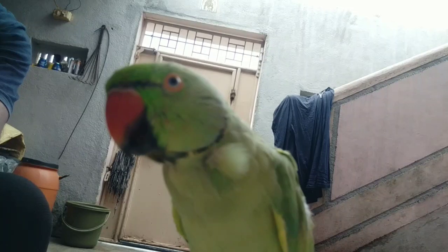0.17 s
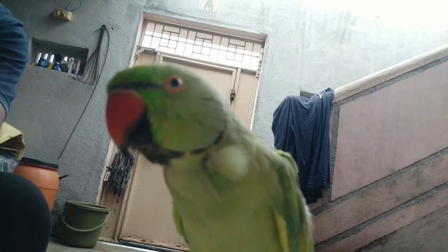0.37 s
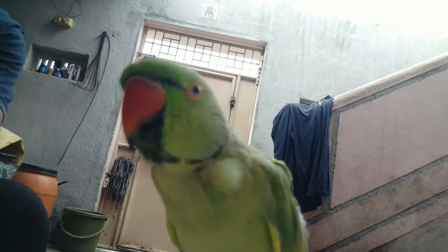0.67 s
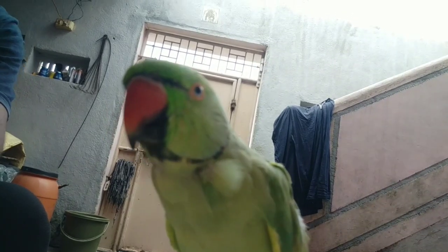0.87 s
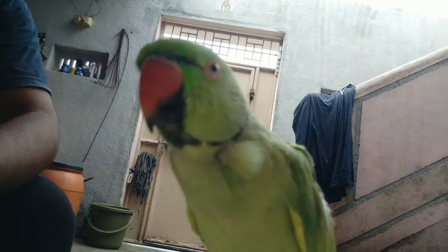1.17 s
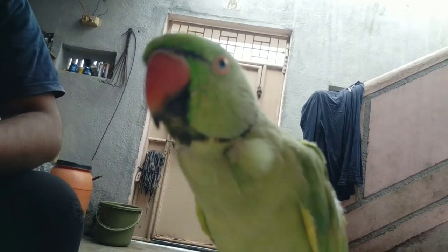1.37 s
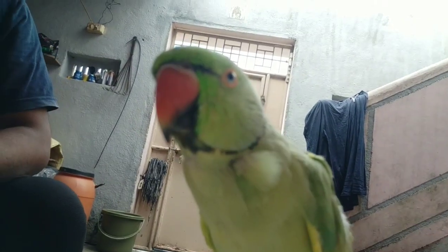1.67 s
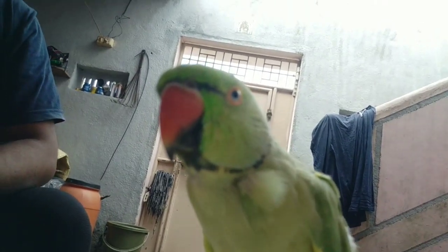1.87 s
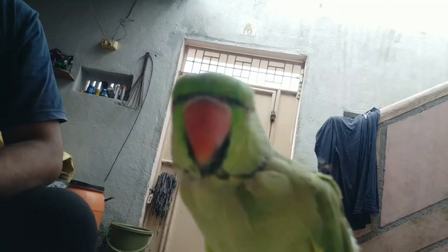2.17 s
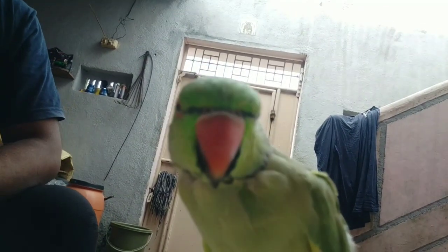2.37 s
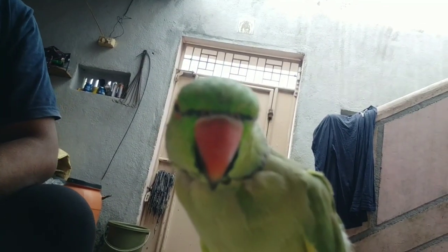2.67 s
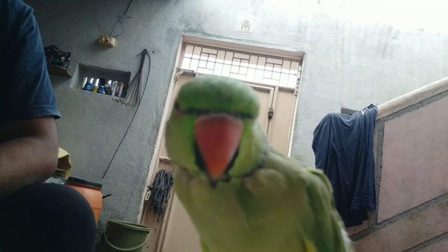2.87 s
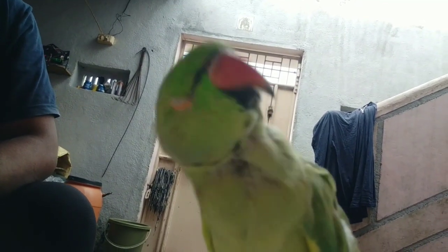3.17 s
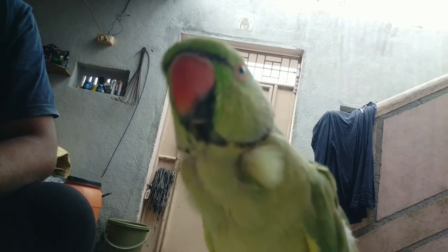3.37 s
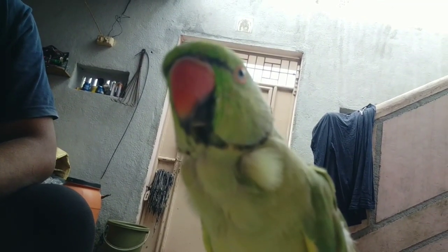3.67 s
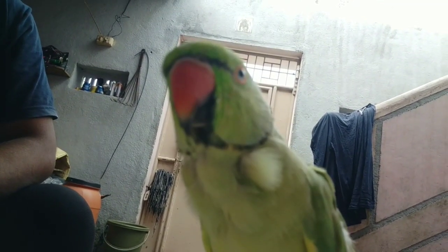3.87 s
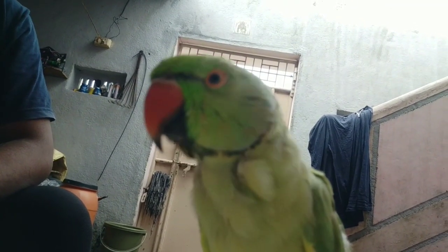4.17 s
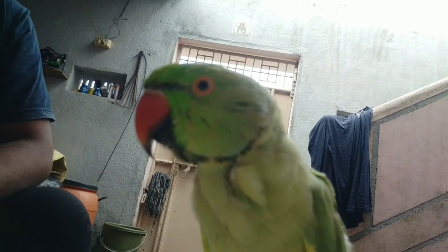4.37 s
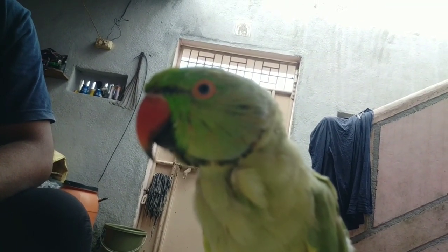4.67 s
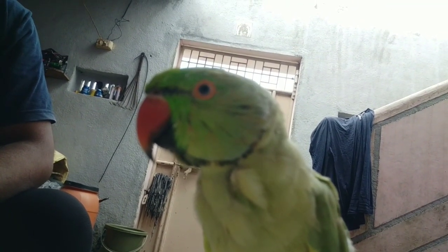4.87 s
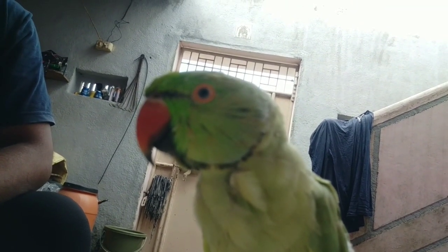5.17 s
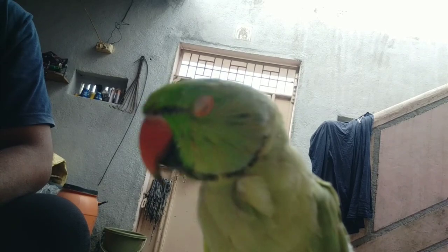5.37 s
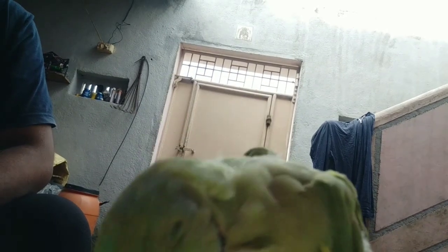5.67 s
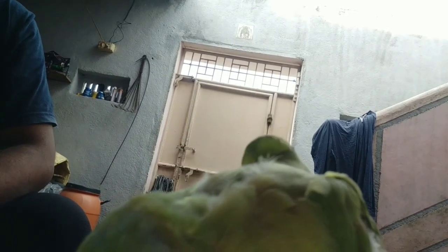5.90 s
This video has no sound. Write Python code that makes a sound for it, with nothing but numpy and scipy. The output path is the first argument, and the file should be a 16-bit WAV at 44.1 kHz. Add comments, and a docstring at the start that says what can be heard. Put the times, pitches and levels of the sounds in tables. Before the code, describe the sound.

In a walled courtyard, a parakeet right beside the microphone gives four short, loud gliding whistles, with a sharp beak click after the second. From about a second and a half on, it is quiet: feathers rustle softly, a hand faintly bumps the microphone, and a small bird chirps beyond the wall. A distant motor drones under a low town rumble.

```python
"""A walled courtyard, a parakeet perched right by a phone's two microphones, town rumble behind.
We come in on the first of four gliding whistles from its syrinx; after the second it clicks its beak.
From 1.5 s on the whistling is over: feathers rustle, a hand bumps the phone, the beak ticks faintly
twice more and a small bird chirps beyond the wall. A distant motor drones, loudest just after 3 s."""
import sys
import numpy as np
from scipy import signal
from scipy.fft import rfft, irfft
from scipy.io import wavfile

SR = 44100
rng = np.random.default_rng(int(sys.argv[2]) if len(sys.argv) > 2 else 0)


def to_wav(s):
    """Save 16-bit WAV."""
    ch = np.atleast_2d(s).T  # columns
    pcm = np.round(np.clip(ch, -1, 1) * 32767)  # PCM
    wavfile.write(sys.argv[1], SR, pcm.astype(np.int16))


N = 266143
T = np.arange(N) / SR
F = np.maximum(np.arange(N // 2 + 1) * SR / N, 1)

# The parakeet, close up, one list a whistle. Each row: time in seconds, pitch in Hz, fundamental in dB,
# mouth resonance in Hz, overtones at that resonance in dB, treble partials in dB.
WHISTLES = [
    [(0.02, 982.4, -25.5, 3400, -7, -20.5), (0.083, 980.7, -21, 3813, -7, -28),
     (0.092, 985.6, -24.5, 3789, -9.5, -27), (0.1, 1012, -28, 3742, -12.5, -24),
     (0.108, 959, -27.5, 3497, -16, -21.5), (0.116, 955, -35.5, 3120, -22.5, -39.5),
     (0.122, 885, -56, 3000, -43.5, -53)],
    [(0.177, 1462, -47, 3194, -55.5, -71), (0.185, 1462, -27, 3300, -33, -54),
     (0.19, 1394, -20, 4000, -17, -33), (0.205, 1204, -23.5, 3285, -17, -28),
     (0.222, 1080, -21.5, 2550, -10.5, -28), (0.24, 998, -23, 2400, -8, -35.5),
     (0.27, 913, -22, 2310, -11.5, -44.5), (0.305, 869, -20.5, 2050, -11.5, -55.5),
     (0.32, 881, -21, 2030, -24.5, -60), (0.36, 875.6, -20.5, 2050, -24.5, -55.5),
     (0.39, 905, -16, 1950, -24.5, -50.5), (0.405, 992, -16, 1950, -21.5, -51.5),
     (0.415, 1088, -17.5, 1950, -22, -49.5), (0.423, 1311, -16, 3400, -39.5, -50),
     (0.445, 1364, -16.5, 3100, -43.5, -44), (0.458, 1361, -43.5, 3200, -59.5, -63)],
    [(0.805, 1234, -45.5, 2500, -64.5, -73.5), (0.83, 1144, -24.5, 2200, -36.5, -64.5),
     (0.885, 1386, -19.5, 3210, -47.5, -54), (0.904, 1559, -23, 6287, -32.5, -51.5),
     (0.918, 1765, -19, 5400, -23, -32.5), (0.93, 1870, -12, 5675, -19, -27.5),
     (0.94, 1987, -14, 5850, -11.5, -26), (0.957, 2286, -15.5, 6900, -37, -46),
     (0.975, 2200, -41.5, 6500, -56, -61.5)],
    [(1.085, 1550, -56, 3180, -65.5, -62), (1.105, 1600, -33.5, 3160, -47, -69),
     (1.19, 1580, -27, 3100, -42.5, -41.5), (1.25, 1636, -18.5, 3220, -49, -32.5),
     (1.3, 1644, -19.5, 3200, -45.5, -28.5), (1.33, 1606, -19.5, 3100, -35.5, -30.5),
     (1.36, 1487, -13.5, 2700, -40.5, -32), (1.385, 1263, -15, 2213, -28, -42),
     (1.41, 1057, -16, 2050, -24.5, -44), (1.44, 975, -19.5, 1850, -24, -55),
     (1.455, 994, -46.5, 1900, -59, -62.5)],
]
# Roughness, one row a whistle. Each row: slow membrane's starting rate in Hz, power of the pitch that it
# follows, its lower sideband, upper sideband and own tone in relative dB, rasp in dB, jitter in radians
# per partial number, slope above the beak's upper corner in dB per octave.
ROUGHNESS = [(350, 0, -55, -55, -62, -21, .03, -20), (330, -.3, -54, -56, -54, -27, .1, -22),
             (395, -.3, -37, -48, -48, -29, .17, -9), (370, .4, -34, -44, -55, -31, .05, -4)]
# Mouth tuning, one row a whistle. Each row: fade under, then over the resonance in dB per octave squared.
MOUTH_SKIRTS = [(9, 130), (44.7, 55), (57.5, 42), (50, 23)]
# The beak's colouring of the treble partials. Each row: frequency in Hz, gain in dB.
BEAK_RESPONSE = [(4500, 3), (6500, 0), (8200, 3), (10000, -2.5), (11500, 0), (13000, -8.5), (15500, -22)]
# The bird's breath. Each row: frequency in Hz, relative density in dB.
BREATH_SPECTRUM = [(250, -16), (1200, -12), (3000, -0.5), (4800, -6.5), (6500, -7), (9000, 2), (12300, -4),
                   (13800, -17), (16000, -29.5)]
# Air past the membranes at attacks and glides. Each row: middle and half length in seconds, level in dB.
AIR_PUFFS = [(0.074, 0.0083, -23), (0.131, .006, -39), (0.192, 0.008, -25), (0.211, .025, -38),
             (0.41, 0.037, -31.5), (0.893, 0.026, -35.5), (0.958, 0.0047, -33), (1.17, .05, -42.5),
             (1.389, 0.038, -31.5)]
# Beak clicks. Each row: start in seconds, peak at the beak in dB.
BEAK_CLICKS = [(0.6455, -8.5), (2.745, -43.5), (5.76, -39)]
# The beak's ring. Each row: frequency in Hz, relative level in dB, 60 dB decay time in seconds.
BEAK_MODES = [(8400, 6.5, .0035), (2000, -5.5, 0.0044), (11340, -12, 0.0022), (750, -21, 0.0092)]
# The parakeet at the two microphones. Each row: frequency in Hz, left over right in dB, left's lead in
# radians.
MIC_DIFFERENCES = [(500, 2, 0.2), (900, 5, 0.2), (1200, 11, 0.0), (1450, 12, -1.3), (1620, 8, -2.5),
                   (1760, 14, -1.8), (2000, 10, -2.4), (2300, 7, -2.9), (2900, 5, -3.3), (3500, 1, -4.4),
                   (4000, 0, -4.2), (4900, -3, -6.1), (5850, -1, -5.3), (6600, -1, -6.3), (8100, -6, -9.0),
                   (9800, -4, -11.2), (11400, -3, -10.5), (14000, 6, -13.8)]
# Feathers and cloth, close by. Each row: middle and half length in seconds, centre in Hz, level in dB.
BRUSHES = [(0.681, .05, 7920, -68), (.8, 0.097, 7900, -79), (1.017, .25, 9400, -40.5),
           (2.368, 0.071, 8400, -52), (2.607, 0.036, 9900, -54.5), (3.257, 0.057, 9600, -55),
           (3.328, 0.096, 7000, -54.5), (3.884, 0.089, 6350, -54)]
# Faint distant calls, narrow swells of sound. Each row: middle and half length in seconds, centre in Hz, level
# in dB.
FAR_CALLS = [(1.073, 0.027, 855, -39.5), (1.167, 0.022, 829, -44.5), (2.997, 0.14, 2954, -64.5),
             (3.769, 0.081, 2397, -58.5), (3.787, 0.075, 4270, -59), (4.409, .11, 3617, -61),
             (4.495, .14, 2370, -58), (5.147, 0.13, 3770, -57), (5.182, 0.027, 2400, -66),
             (5.694, 0.11, 3520, -65.5)]
# A hand on the phone. Each row: middle and half length in seconds, pitch in Hz, level in dB.
HAND_BUMPS = [(0.512, 0.11, 40.2, -48), (0.48, 0.034, 222, -53), (1.5, 0.0642, 39.3, -54),
              (2.399, 0.048, 40, -48.5), (5.815, 0.039, 41.9, -52), (5.874, 0.074, 81.6, -52)]
# The bird beyond the wall. Each row: start and length in seconds, starting pitch in Hz, fall in octaves
# per second, level in dB.
FAR_CHIRPS = [(1.579, 0.087, 6974, 3.5, -50), (1.99, 0.11, 6450, 2.5, -51.5), (2.418, .11, 7170, 3.5, -49),
              (2.843, 0.094, 7410, 4, -47.5), (3.091, 0.064, 6300, 2, -53.5),
              (3.12, 0.076, 4340, 4.5, -54.5), (3.574, 0.061, 7040, 2.7, -45.5),
              (3.986, 0.058, 6880, 4.5, -48.5), (4.174, 0.043, 5950, 1.7, -56),
              (4.222, 0.063, 4600, 6.5, -58), (4.358, 0.073, 7060, 4.5, -48.5),
              (4.472, 0.067, 7020, 4, -47), (4.704, 0.067, 5660, -1.6, -52), (4.756, 0.073, 6890, 3.5, -48),
              (5.15, 0.09, 7060, 3.5, -46.5), (5.57, 0.087, 6670, 2.5, -49), (5.625, .1, 5616, 4.5, -55)]
# The distant motor. Each row: time in seconds, level in dB.
MOTOR_LEVELS = [(0.1, -67), (0.55, -72), (0.8, -59.5), (1.4, -67), (2.3, -62.5), (3.3, -54.5), (3.7, -60),
                (4.82, -58), (5.5, -71), (6.03, -67)]
# Faint passing hums. Each row: middle and half length in seconds, centre and width in Hz, level in dB.
PASSING_HUMS = [(4.5, 0.77, 162, 11.4, -62), (5.0, 0.24, 195, 7.3, -65.5)]
# The town from inside the yard. Each row: frequency in Hz, relative density in dB.
TOWN_SPECTRUM = [(15, -31.5), (24, -4), (33, -4.5), (40, -1), (55, -8.5), (80, -5.5), (120, -9), (277, -19),
                 (489, -19), (624, -23.5), (936, -26.5), (3620, -27.5), (5280, -30), (14800, -34.5),
                 (16000, -56)]
# How alike the town is at the two microphones. Each row: frequency in Hz, correlation from -1 to 1.
TOWN_LIKENESS = [(30, .8), (60, .88), (130, .9), (290, .65), (640, .41), (1410, -.1), (3100, .02),
                 (15000, .02)]

BEAK_LOW_HZ, BEAK_HIGH_HZ = 5940, 7900  # treble partials thin out beyond these corners
BEAK_LOW_DB_PER_OCTAVE, PARTIAL_WAVER_DB = -35.5, 1.5
LEAK_DB = -35.5  # steady breath, relative to the fundamental
OPEN_S, TOP_HZ = .0824, 15700


def undb(db):
    """Turn dB into gain."""
    return 10 ** (np.asarray(db) / 20)


def unit(x):
    """Scale to rms 1."""
    return x / np.sqrt(np.mean(x ** 2))


def along(table, hz, column=1):
    """Read a column of a spectrum table on a log-frequency axis."""
    table = np.array(table, float)
    return np.interp(np.log(hz), np.log(table[:, 0]), table[:, column])


def noise(gain, channels=2):
    """Noise of rms 1 with the given gain per frequency, unrelated in each channel."""
    return unit(irfft(rfft(rng.standard_normal((channels, N))) * gain, N))


def peak(hz, width_hz):
    """Gain of a resonance applied twice."""
    return 1 / (1 + ((F - hz ** 2 / F) / width_hz) ** 2)


def swell(middle, half):
    """A bell-shaped rise and fall, timed in seconds."""
    return np.exp(-((T - middle) / half) ** 2)


def parakeet_whistles():
    """Tone and breath, close up: mouth and beak shape the syrinx; a slower membrane adds sidebands."""
    tone, breath = np.zeros(N), np.zeros(N)
    flutter = noise(peak(90, 230), channels=1)[0]
    shimmer = noise(peak(250, 900), channels=1)[0]
    waver = noise(peak(15, 40), channels=15)  # each treble partial swells and fades on its own
    puffs = sum(undb(db) * swell(s, half) for s, half, db in AIR_PUFFS)
    for rows, (under_db, over_db), roughness in zip(WHISTLES, MOUTH_SKIRTS, ROUGHNESS):
        slow_hz, follow, lower_db, upper_db, slow_db, rasp_db, jitter, slope_db = roughness
        times, *columns = np.transpose(rows)
        span = slice(int(times[0] * SR), int((times[-1] + .004) * SR))
        t = T[span]
        hz, level_db, mouth_hz, mouth_db, treble_db = (np.interp(t, times, c) for c in columns)
        phase = 2 * np.pi * np.cumsum(hz) / SR
        slow = 2 * np.pi * np.cumsum(slow_hz * (hz / hz[0]) ** follow) / SR
        sidebands = undb(lower_db) * np.sin(phase - slow) + undb(upper_db) * np.sin(phase + slow)
        membrane = sidebands + undb(slow_db) * np.sin(slow)
        # the slow membrane swells by half as many dB as the whistle
        voice = undb(level_db) * np.sin(phase) + undb(.5 * level_db) * membrane
        for k in range(2, 17):
            partial_hz = k * hz
            skirt_db = np.where(partial_hz < mouth_hz, under_db, over_db)
            overtone_db = mouth_db - skirt_db * np.log2(partial_hz / mouth_hz) ** 2
            voice += undb(overtone_db) * np.sin(k * phase + k * k)
            beak_db = treble_db + along(BEAK_RESPONSE, partial_hz)
            beak_db += slope_db * np.log2(np.maximum(partial_hz / BEAK_HIGH_HZ, 1))
            beak_db += BEAK_LOW_DB_PER_OCTAVE * np.log2(np.maximum(BEAK_LOW_HZ / partial_hz, 1))
            beak_db += PARTIAL_WAVER_DB * waver[k - 2, span]
            jittered = k * (phase + jitter * flutter[span])
            voice += (partial_hz < TOP_HZ) * undb(beak_db) * np.cos(jittered + k * k)
        rasp = 1 + undb(rasp_db) * shimmer[span]  # uneven cycles fill the gaps between partials
        fade = np.clip(np.minimum(t - t[0], t[-1] - t) / .001, 0, 1)
        tone[span] += np.sqrt(2) * voice * fade * rasp
        breath[span] += (puffs[span] + undb(level_db + LEAK_DB)) * fade
    return tone, breath * noise(undb(along(BREATH_SPECTRUM, F)), channels=1)[0]


def beak_clicks():
    """At each click the horn of the beak rings for a few milliseconds."""
    out = np.zeros(N)
    t = np.arange(SR // 20) / SR
    ring = sum(undb(db - 60 * t / t60) * np.sin(2 * np.pi * hz * t) for hz, db, t60 in BEAK_MODES)
    ring *= np.clip(t / .0005, 0, 1)
    for s, db in BEAK_CLICKS:
        start = int(s * SR)
        out[start:start + len(t)] += undb(db) * ring / np.abs(ring).max()
    return out


def at_microphones(x):
    """A close source reaches the two microphones at different level and phase; the mean power stays."""
    ratio = undb(along(MIC_DIFFERENCES, F))
    lead = np.exp(.5j * along(MIC_DIFFERENCES, F, column=2))
    left_right = np.array([ratio * lead, 1 / lead]) * np.sqrt(2 / (1 + ratio ** 2))
    return irfft(rfft(x) * left_right, N)


def wall_echo(x, t60, treble_t60, build_s):
    """Diffuse echoes off the walls build up and die away, unrelated left and right."""
    t = np.arange(SR) / SR
    white = rng.standard_normal((2, SR))
    low = signal.lfilter(*signal.butter(2, 3000, fs=SR), white)
    tail = low * undb(-60 * t / t60) + (white - low) * undb(-60 * t / treble_t60)
    tail *= np.clip(t / build_s, 0, 1) ** 2
    tail /= np.sqrt(np.sum(tail ** 2) / 2)
    return signal.fftconvolve(np.atleast_2d(x), tail, axes=1)[:, :N]


def rustles():
    """Feathers and cloth brush near the microphones as broad grainy hiss; faint narrow-band calls swell in the
    distance."""
    grain = undb(.73 * noise(peak(200, 600)))
    rolloff = 1 + (F / 13660) ** 8
    brush = sum(undb(db) * swell(s, half) * noise(np.sqrt(peak(hz, 1.15 * hz) / rolloff))
                for s, half, hz, db in BRUSHES)
    hush = sum(undb(db) * swell(s, half) * noise(np.sqrt(peak(hz, .31 * hz)))
               for s, half, hz, db in FAR_CALLS)
    return (brush + hush) * grain


def handling():
    """A hand on the phone makes low bumps, the same in both microphones."""
    return sum(undb(db) * swell(s, half) * np.sqrt(2) * np.sin(2 * np.pi * hz * (T - s))
               for s, half, hz, db in HAND_BUMPS)


def far_bird():
    """Trilled chirps beyond the wall, nearly all falling, heard mostly through their echoes."""
    trill_hz, trill_depth_hz, ragged_db, direct_db = 55.45, 338, 2, -8.5
    out = np.zeros(N)
    for s, length, start_hz, fall, db in FAR_CHIRPS:
        t = np.arange(int(length * SR)) / SR
        hz = start_hz * 2 ** (-fall * t) + trill_depth_hz * np.sin(2 * np.pi * trill_hz * t)
        arch = np.sin(np.pi * t / length)
        start = int(s * SR)
        out[start:start + len(t)] += undb(db) * arch * np.sin(2 * np.pi * np.cumsum(hz) / SR)
    out *= undb(ragged_db * noise(peak(60, 110), channels=1)[0])
    return undb(direct_db) * out + wall_echo(out, t60=.59, treble_t60=.59, build_s=.0008)


def motor():
    """A distant motor drones on one wavering low note, swelling and sinking."""
    hz = 104 + 1.8 * noise(peak(7.7, 8), channels=1)[0]
    level = undb(np.interp(T, *np.transpose(MOTOR_LEVELS)))
    return level * np.sqrt(2) * np.sin(2 * np.pi * np.cumsum(hz) / SR)


def far_hums():
    """Faint hums come and go in the distance, with one thin sinking tone."""
    hums = sum(undb(db) * swell(s, half) * noise(peak(hz, width), channels=1)
               for s, half, hz, width, db in PASSING_HUMS)
    middle_s, tone_hz, glide_hz_per_s = 5.03, 672, -30
    t = T - middle_s
    tone = np.sin(2 * np.pi * (tone_hz + .5 * glide_hz_per_s * t) * t)
    return hums + undb(-67) * swell(middle_s, half=.33) * tone


def town():
    """Rumble and hiss from outside the yard, alike at both microphones in the bass."""
    likeness = along(TOWN_LIKENESS, F)
    spectra = rfft(rng.standard_normal((2, N))) * undb(along(TOWN_SPECTRUM, F))
    mid, side = spectra * np.sqrt([1 + likeness, 1 - likeness])
    return undb(-54) * unit(irfft(np.array([mid + side, mid - side]), N))


def scene():
    """The parakeet up close, echoed by the near corner and the whole yard, over a quiet background."""
    tone, breath = parakeet_whistles()
    clicks = beak_clicks()
    to_walls = tone + undb(-5.5) * clicks  # less of the clicks reaches the walls
    corner = undb(-16.5) * wall_echo(to_walls, t60=.18, treble_t60=.18, build_s=.0075)
    yard = undb(-18) * wall_echo(to_walls, t60=.58, treble_t60=.63, build_s=.0117)
    parakeet = at_microphones(tone + clicks + breath) + corner + yard
    return parakeet + far_bird() + rustles() + handling() + town() + motor() + far_hums()


def record(dry):
    """The microphones open mid-whistle after a moment of silence; peaks are rounded, the top is cut."""
    opened = dry * np.clip((T - OPEN_S) / .0005, 0, 1)
    knee, headroom = .6, .3
    squeezed = knee + headroom * np.tanh((np.abs(opened) - knee) / headroom)
    rounded = np.where(np.abs(opened) < knee, opened, np.sign(opened) * squeezed)
    return signal.sosfilt(signal.ellip(8, .2, 70, TOP_HZ, fs=SR, output="sos"), rounded)


dry = scene()
out = record(dry)
to_wav(out)
```